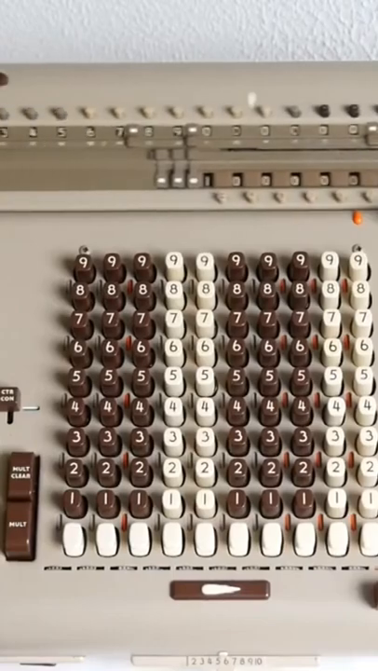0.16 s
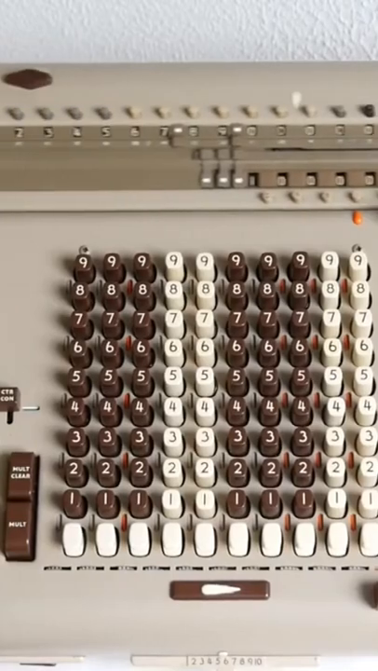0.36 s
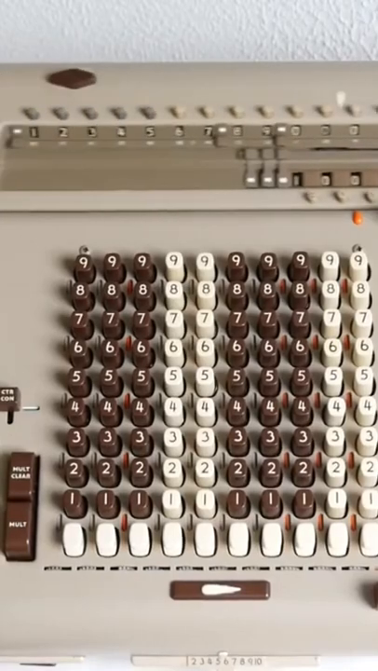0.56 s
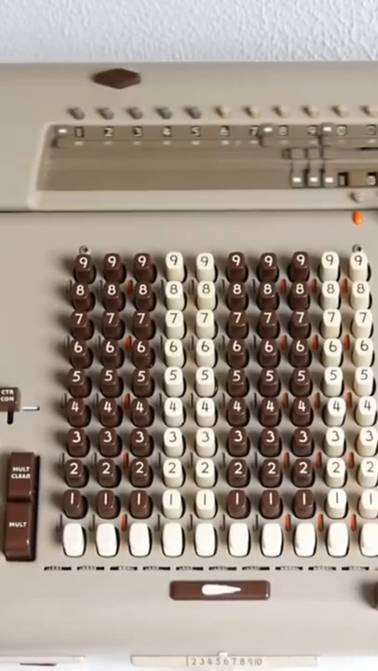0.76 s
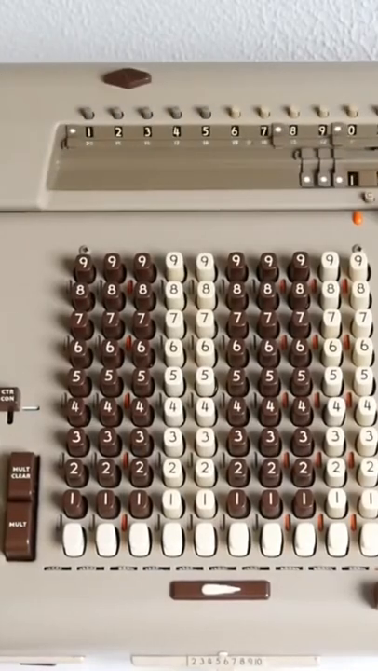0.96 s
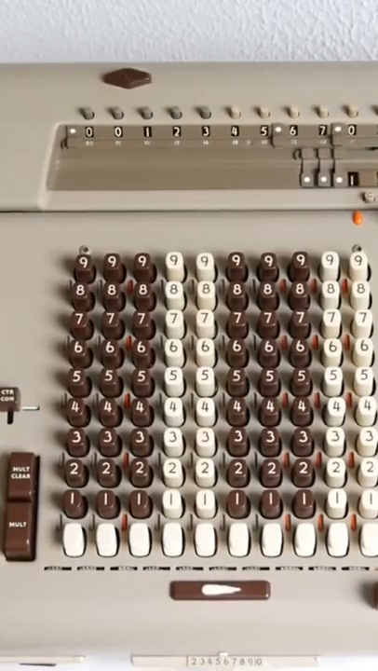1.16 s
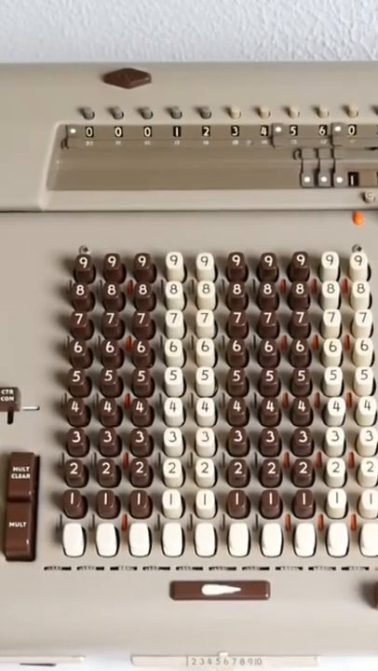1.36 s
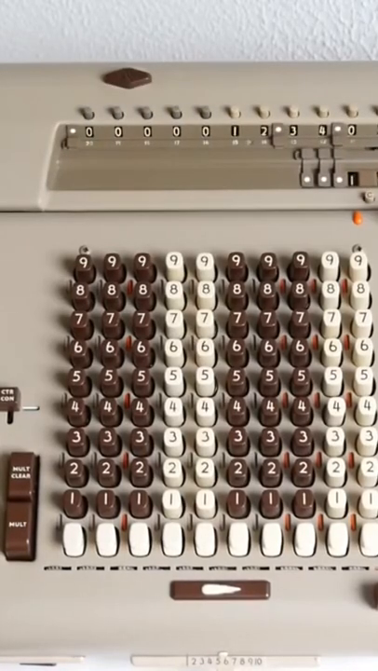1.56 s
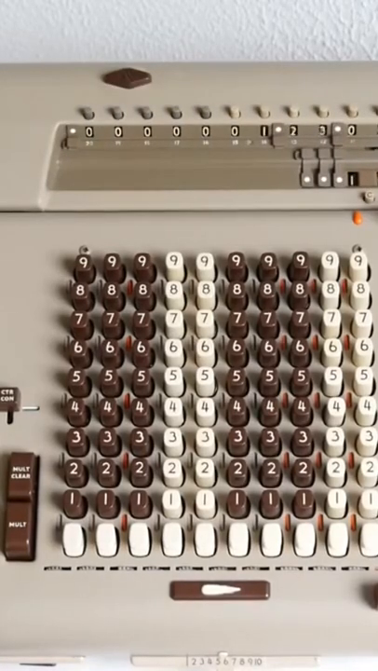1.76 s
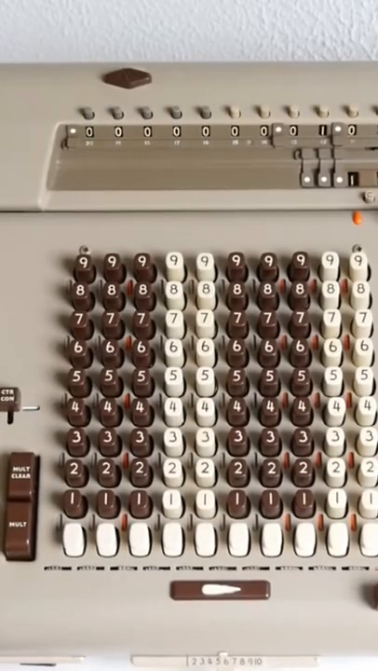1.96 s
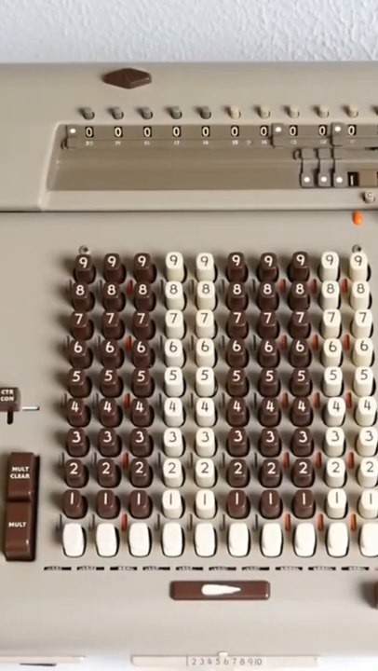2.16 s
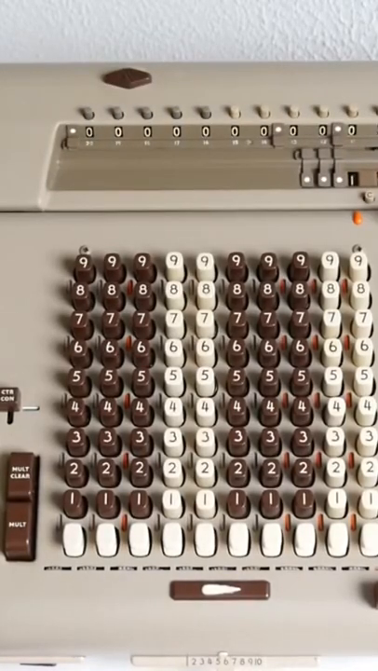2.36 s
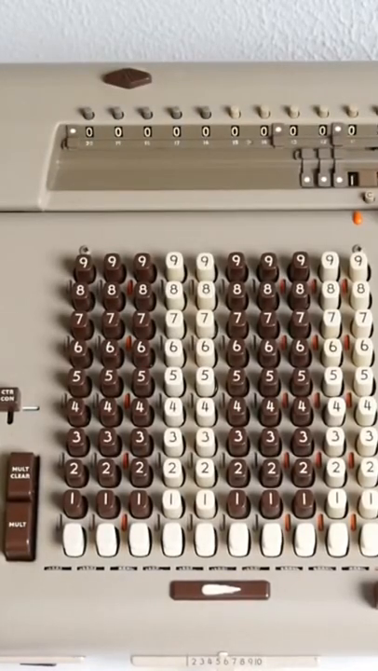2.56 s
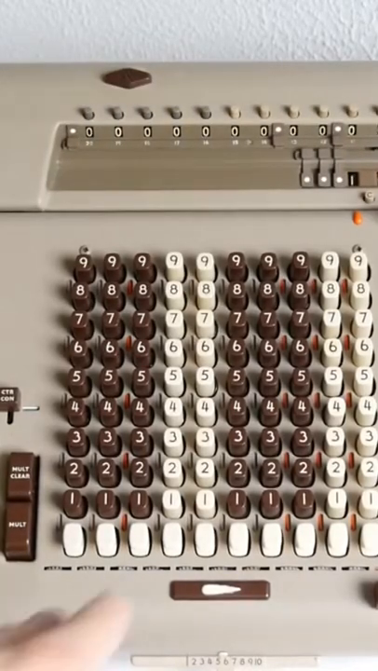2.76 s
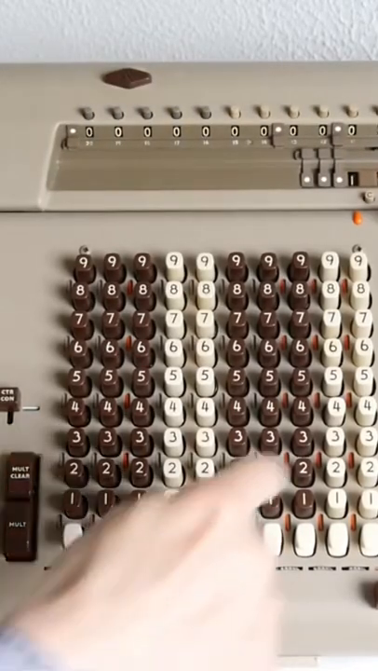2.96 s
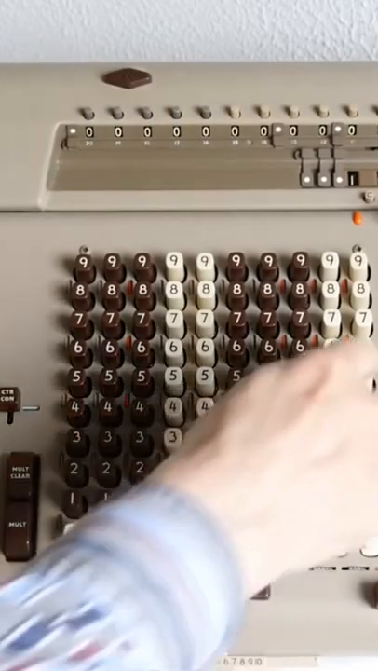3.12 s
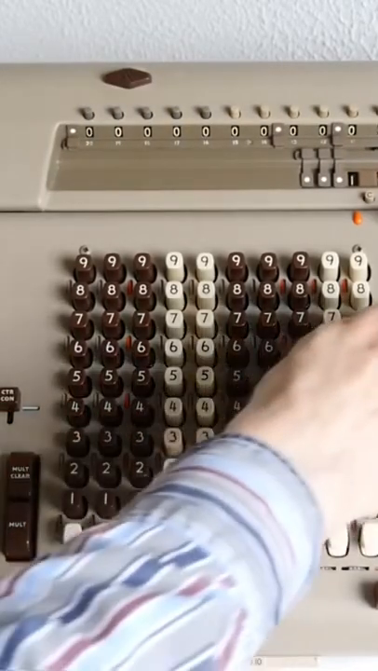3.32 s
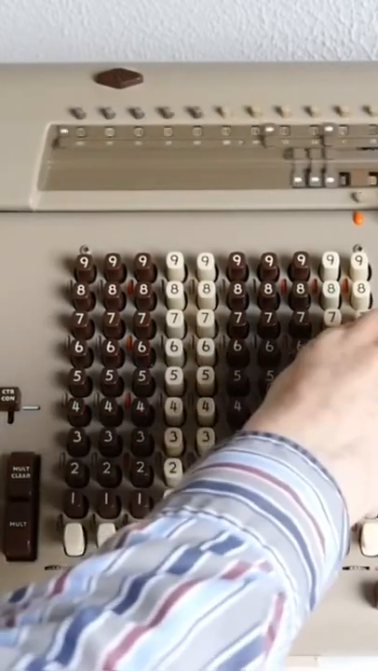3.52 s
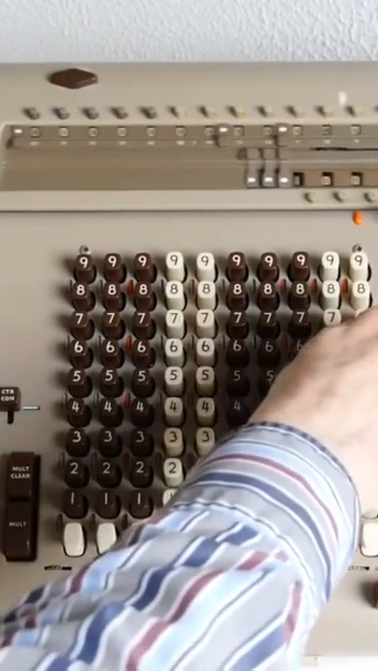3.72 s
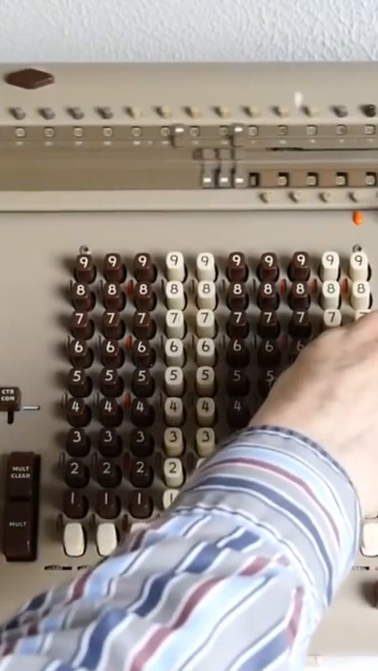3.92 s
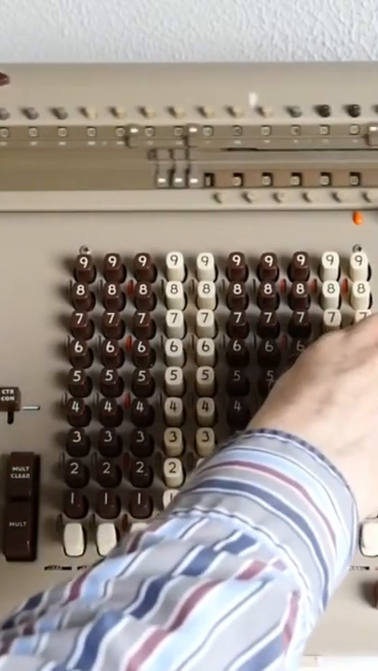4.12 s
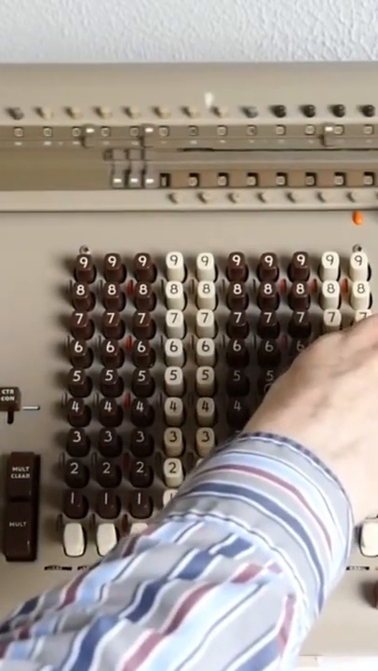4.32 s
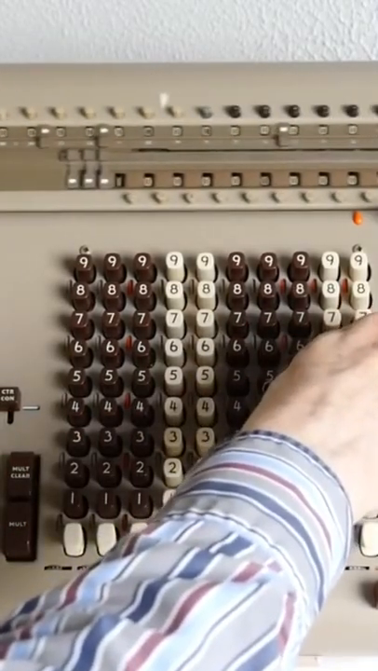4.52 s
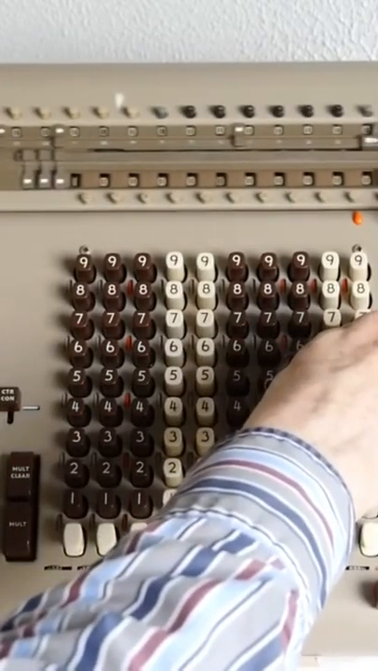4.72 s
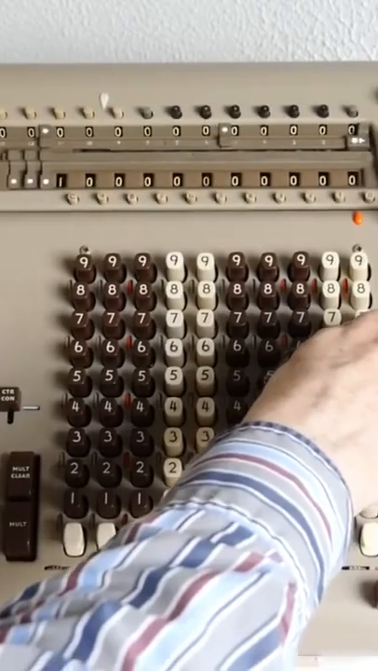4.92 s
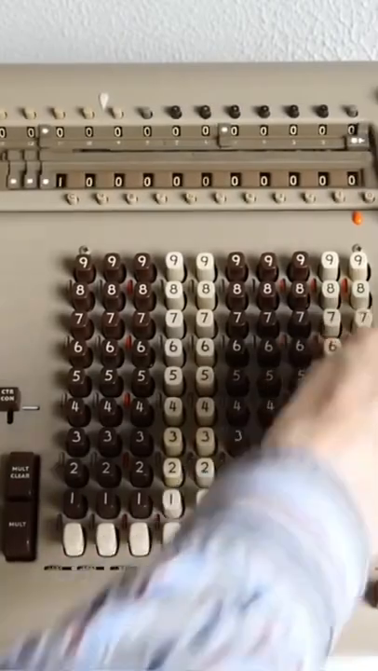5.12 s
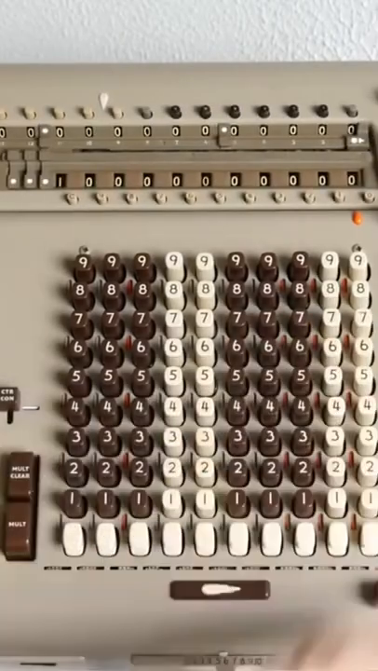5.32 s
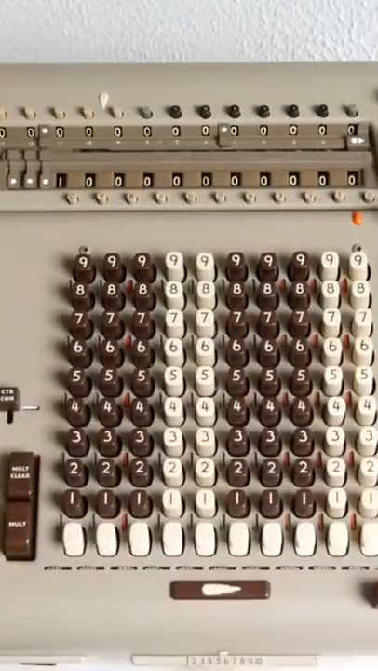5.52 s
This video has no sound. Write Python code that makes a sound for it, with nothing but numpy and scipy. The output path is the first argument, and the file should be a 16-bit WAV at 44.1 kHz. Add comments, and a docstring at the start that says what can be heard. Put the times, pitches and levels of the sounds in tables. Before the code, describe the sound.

Close up in a quiet room, an old electric calculating machine rattles about seven to eight times a second, first stepping its carriage, then cycling number wheels. The motor coasts down and cuts off. A sleeve rustles softly, a key clicks, the clutch clanks, and the carriage clatters back to a hard metallic stop, with the motor whirring briefly afterwards.

```python
"""A fast, regular clatter comes first: a motor-driven mechanical calculator, close up in a quiet room.
Its main shaft turns 7.6 times a second, and every turn trips a row of cams: first stepping the carriage,
then cycling the number wheels. The motor coasts and stops; an arm rustles, a key clicks, the carriage runs
back and slams home, and the motor coasts again. Impacts are short noise sprays ringing case and steel;
the motor is coloured noise plus wavering tones, and the room is faint noise and a short echo."""
import sys
import numpy as np
from scipy import signal
from scipy.fft import rfft, irfft, next_fast_len
from scipy.io import wavfile
from scipy.ndimage import map_coordinates

SR = 44100
rng = np.random.default_rng(int(sys.argv[2]) if len(sys.argv) > 2 else 0)


def master(y):
    """Save y as 16-bit WAV."""
    cut = np.clip(np.atleast_2d(y).T, -1, 1)
    pcm = np.round(cut * 32767)  # scale
    wavfile.write(sys.argv[1], SR, pcm.astype(np.int16))


N = 246078
TURN_S = .1308  # one turn of the main shaft


def works():
    """The running mechanism: the case thuds, heavy levers clack and light pawls tick at each contact."""
    rows = contacts(jitter_s=.0001, scatter_db=1, chatter_s=0.0032, tooth_spread_db=1.5)
    times, thud_db, clack_db, tick_db, chatter = rows.T
    split_hz = 4650  # clacks lie below this, ticks above

    def heavy(hz):
        return 1 / (1 + (hz / split_hz) ** 8)

    def light(hz):
        return 1 - heavy(hz)

    clacks = steel(times, clack_db, chatter, heavy, spiky_db=13, ring_db=1.0, t60=0.22, colour_db=2.2)
    ticks = steel(times, tick_db, chatter, light, spiky_db=15.5, ring_db=3.0, t60=0.15, colour_db=0.8)
    thuds = case(times, thud_db, chatter, firm_db=-4.5, loose_db=-9.0)
    return thuds + amp(-2.0) * clacks + amp(-2.5) * ticks


# Contacts within one turn, one table for each job; levels add to those of the job.
# Columns: into_turn_s, thud_db, clack_db, tick_db
SHIFT_CAMS = [(0.007, -14.5, -12.5, -11.5), (0.0116, -16, -13.5, -6.5), (0.0135, -14, -8, -4.5),
              (0.0224, -12, -30, -18), (0.0314, -11.5, -9.5, -9.5), (0.037, -21, -8, -7.5),
              (0.0413, -24, -10, -3), (0.046, -12, -26, -6.5), (0.0475, -7.5, -10.5, -7),
              (0.0604, -13, -30, -28.0), (0.0636, -18, -12, -23), (0.0721, -9.5, -13.5, -15),
              (0.078, -19, -18.5, -18), (0.0886, -16, -14.5, -27), (0.0974, -15, -17.5, -21),
              (0.1029, -15, -18, -28.0), (0.111, -13.5, -22, -22), (0.1226, -19, -16, -16)]
ADD_CAMS = [(.001, -20, -6, -4.5), (.0075, -21.5, -13, -15), (0.0098, -16, -11, -10),
            (0.0129, -12.5, -13, -6.5), (0.0355, -22, -9, -11), (0.0426, -18, -11.5, -24),
            (.049, -12, -13, -22), (0.0632, -16, -16.5, -14.5), (0.0686, -15, -11, -13.5),
            (0.0836, -16.5, -19, -22), (0.0881, -15, -11.5, -15.5), (0.0951, -17.5, -9, -13),
            (.0985, -8.5, -9, -10.5), (.102, -8, -17, -15), (0.1119, -11.5, -11, -9),
            (0.1175, -10, -11, -23), (0.1235, -15, -11, -13), (0.1282, -16, -13, -18)]
RETURN_CAMS = [(0.0012, -12, -13, -14), (0.0065, -14.5, -9.5, -6), (0.0098, -4, -12.5, -21),
               (0.0216, -10.5, -16, -10.5), (0.0302, -9, -11, -17.5), (0.0388, -8, -17.5, -19),
               (0.0439, -12, -15.5, -19), (0.049, -13, -14, -11), (0.0566, -11, -11, -13),
               (0.0654, -11, -12, -22), (0.0703, -8, -14, -11), (0.0776, -7, -11.5, -12),
               (0.0872, -23, -12.5, -13), (0.095, -10.5, -8.5, -8.5), (0.1031, -8, -8, -7),
               (0.1176, -12, -18, -15.5), (0.1217, -14, -17, -11), (0.1274, -16, -8, -18)]
# The three jobs: stepping the carriage, cycling the wheels, running the carriage back.
# Columns: start_s, stop_s, thud_db, clack_db, tick_db, drop_at_start_db, drop_at_end_db (negative = louder)
JOBS = [(0.0, 0.786, -25, -26, -30.5, 0, -1.5), (0.785, 2.056, -23.5, -26.5, -25, 0, 7),
        (3.3757, 5.075, -24.5, -24, -27, 2, 1.5)]
# One gear tooth meeting the next, before the job's level is added.
TOOTH_DB = (-24.5, -30, -35)  # thud, clack, tick
TOOTH_CHATTER_S = .004
# The drive goes slack after the carriage's last catch, so its clacks and ticks soften.
SLACK_FROM_S, SLACK_UNTIL_S, SLACK_DB = 4.806, 4.9, -3


def contacts(jitter_s, scatter_db, chatter_s, tooth_spread_db, count=48):
    """All contacts, repeated by cams and teeth or single: (s, thud dB, clack dB, tick dB, chatter s)."""
    rows = []
    for job, cams in zip(JOBS, (SHIFT_CAMS, ADD_CAMS, RETURN_CAMS)):
        start, stop, *job_db, _, _ = job
        # uneven teeth rattle between the cams, in the same pattern on every turn of the job
        when = (np.arange(count) + rng.random(count)) * TURN_S / count
        size_db = tooth_spread_db * rng.standard_normal((count, 3)) + TOOTH_DB
        teeth = [(s, *db, TOOTH_CHATTER_S) for s, db in zip(when, size_db)]
        turn = np.array([(*cam, chatter_s) for cam in cams] + teeth)
        run = np.vstack([turn + (s, *job_db, 0) for s in np.arange(start, stop, TURN_S)])
        s = run[:, :1]
        run[:, 1:4] += effort_db(job, s)
        run[:, 2:4] += SLACK_DB * ((s > SLACK_FROM_S) & (s < SLACK_UNTIL_S))
        rows += list(run[run[:, 0] < stop])
    spread = [jitter_s, scatter_db, scatter_db, scatter_db, 0]
    chance = rng.standard_normal((len(rows), 5)) * spread
    return np.vstack([blows(), carries(), idling(scatter_db=0.5), rows + chance])


def effort_db(job, s):
    """A job's impacts keep their middle level for most of its course and change toward the two ends."""
    start, stop, *_, first_db, last_db = job
    power = 3.6  # the higher, the longer the middle level lasts
    along_job = np.clip(2 * (s - start) / (stop - start) - 1, -1, 1)
    return -np.where(along_job < 0, first_db, last_db) * np.abs(along_job) ** power


# The carry ripples along the number wheels, one wheel farther on every turn.
CARRY_END_S, CARRY_STEP_S = .137, .0066  # end of ripple after the turn starts; time between wheels
CARRY_DB, CARRY_LOSS_DB = (-48, -35.5, -38.5), 4  # first wheel's thud, clack, tick; loss per wheel
CARRY_CHATTER_S = 0.0029


def carries(count=7):
    """On each turn the carry trips one more pawl than on the last, so its ripple starts earlier."""
    start = JOBS[1][0]
    rows = []
    for turn in range(1, count + 1):
        end = start + turn * TURN_S + CARRY_END_S
        for wheel in range(turn):
            level_db = np.subtract(CARRY_DB, CARRY_LOSS_DB * wheel)
            rows.append((end - (turn - wheel) * CARRY_STEP_S, *level_db, CARRY_CHATTER_S))
    return rows


# The carriage or the shaft slams into a stop.
# Columns: start_s, thud_db, clack_db, tick_db, rocking_of_the_case_db
STOPS = [(.6906, -36, -32, -35, -39), (1.9878, -45, -34, -26.5, -30), (5.067, -62, -28.5, -25, -36.5)]
SLAM_CHATTER_S = 0.0008
# Each stop rebounds once; its levels add to the slam's thud, clack and tick.
REBOUND_S, REBOUND_DB, REBOUND_CHATTER_S = .0027, (-18, 0.5, -8.5), 0.002
# Latches drag over their catches. Columns: start_s, clack_db, tick_db
LATCHES = [(0.665, -40, -45), (.678, -35, -47), (0.712, -36, -42), (.788, -33, -26.5), (0.799, -45, -42),
           (.913, -29, -28), (.922, -41, -31), (1.827, -35, -27.5), (1.847, -27, -26.5),
           (1.969, -27.5, -26), (1.975, -29, -25.5)]
LATCH_THUD_DB, LATCH_CHATTER_S = -48, 0.0069
# The moving carriage and wheels knock. Columns: start_s, thud_db, clack_db, tick_db, chatter_s
KNOCKS = [(1.191, -39, -34, -31, .003), (1.9642, -35, -27, -31, .0012), (2.096, -40, -46, -56, 0.0022),
          (3.514, -52, -33, -52, 0.0012), (3.896, -43, -32, -34, .002), (4.036, -47, -36, -39, 0.0019),
          (4.171, -44, -32, -43, 0.0019), (4.428, -30.5, -36, -39, 0.0041),
          (4.695, -44, -29.5, -49, 0.0051), (4.722, -27, -43, -33, 0.0088),
          (4.8022, -35, -31, -29.5, 0.0017), (5.0765, -48, -32.5, -30.5, 0.0013)]
# Keys and their links click. Columns: start_s, level_db
KEYS = [(3.2947, -47), (3.2984, -45), (3.3023, -37), (3.3422, -35), (3.351, -35.5), (5.243, -47),
        (5.369, -50), (5.428, -57)]
KEY_DB, KEY_CHATTER_S = (-23, -4, -1), .002  # thud, clack, tick added to each key's level
# The clutch grabs as the carriage starts back. Columns: start_s, level_db, pitch_hz (rings most near it)
CLUTCH = [(3.358, -20, 1910), (3.371, -12.5, 1790), (3.387, -10.5, 2187)]
GRAB_DB, GRAB_CHATTER_S = (-20.5, -21, -38), 0.0067  # jolt's thud, clack, tick added to each grab's level


def blows():
    """Single contacts of latches, knocks, keys and clutch, and stops that rebound and rock the case."""
    rows = [(s, LATCH_THUD_DB, clack, tick, LATCH_CHATTER_S) for s, clack, tick in LATCHES]
    rows += list(KNOCKS)
    rows += [(s, *np.add(db, KEY_DB), KEY_CHATTER_S) for s, db in KEYS]
    rows += [(s, *np.add(db, GRAB_DB), GRAB_CHATTER_S) for s, db, _ in CLUTCH]
    for s, *slam_db, rock_db in STOPS:
        rows.append((s, *slam_db, SLAM_CHATTER_S))
        rows.append((s + REBOUND_S, *np.add(slam_db, REBOUND_DB), REBOUND_CHATTER_S))
        rows += rocking(s, rock_db, count=3)
    return rows


def rocking(s, db, count):
    """After a stop the case rocks on its feet a few times, each time more softly."""
    period_s, loss_db, chatter_s = .021, 5, 0.0076
    rattle_db = -4.5  # clack and tick against the thud
    rows = []
    for k in range(count):
        thud = db - loss_db * k
        rows.append((s + period_s * (k + 1), thud, thud + rattle_db, thud + rattle_db, chatter_s))
    return rows


# Loose gears rattle as the motor coasts: starting thud, clack and tick.
IDLE_DB, IDLE_CHATTER_S = (-83, -58.5, -55.5), 0.0013


def idling(scatter_db, count=22):
    """Unloaded gears tap to and fro in their play, ever more softly."""
    rows = []
    for _, released, off, *_ in MOTOR_RUNS:
        coasted = (np.arange(count) + rng.random(count)) / count * (off - released)
        size_db = scatter_db * rng.standard_normal(count) - WHIRR_SAG_DB_PER_S * coasted
        rows += [(released + s, *np.add(db, IDLE_DB), IDLE_CHATTER_S) for s, db in zip(coasted, size_db)]
    return rows


def contact_gain(levels):
    """Level to impulse size: one contact a turn at 0 dB would have an rms of 1."""
    return amp(levels) * np.sqrt(TURN_S * SR)


def bounces(times, levels, chatter, spiky_db):
    """Each contact closes and then chatters in a dying spray of tiny impacts."""
    t = np.arange(SR // 30) / SR
    shape = (len(times), len(t))
    age = t / chatter[:, None]
    uneven = amp(spiky_db * rng.standard_normal(shape) / 2)
    spray = rng.standard_normal(shape) * uneven * np.exp(-age) * (1 - np.exp(-age / 0.36))
    spray *= (contact_gain(levels) / np.linalg.norm(spray, axis=1))[:, None]
    at = np.round(np.abs(times) * SR).astype(int)[:, None] + np.arange(len(t))
    return np.bincount(at.ravel(), spray.ravel(), N)[:N]


# Resonances of the case and frame. Columns: pitch_hz, width_hz, level_db
CASE = [(96, 12, -20), (124.5, 9.7, -6), (165, 8.9, -6.5), (195, 7.9, 3.5), (253.7, 12.4, -3),
        (280.7, 12.6, 5), (309.5, 13.5, 5.5), (343.6, 20.6, 1), (426, 8.8, 1.5), (450, 42, -11),
        (534.1, 7.8, -2), (631, 13, -3.5), (737, 25, -5.5), (854, 14, -4.5)]


def case(times, levels, chatter, firm_db, loose_db):
    """Contacts push the resonant case: a firm push of fixed shape plus a random, loose shudder."""
    at = np.round(np.abs(times) * SR).astype(int)
    pushes = np.bincount(at, contact_gain(levels), N)[:N]
    shudder = bounces(times, levels, 2 * chatter, spiky_db=10.5)

    def body_gain(f):
        power = sum(np.abs(amp(db) * f * w / (c * c - f * f + 1j * f * w)) ** 2 for c, w, db in CASE)
        power = power / (1 + (f / 900) ** 6)  # less treble
        return np.sqrt(power / (1 + (70 / (f + 1)) ** 2))  # less deep bass

    return through(amp(firm_db) * pushes + amp(loose_db) * shudder, causal(body_gain))


# Ring of the steel levers and wheels. Columns: pitch_hz, level_db (per Hz)
STEEL = [(250, -22.5), (500, 3.5), (750, 0), (1000, -2), (1600, 0.5), (2300, -1.5), (3500, -1.5),
         (5200, -2), (7500, -1), (9000, 1), (10100, 3), (10900, -1), (11600, -13.5), (12200, -73)]
PART_BAND_HZ = 259  # breadth of each steel part's own colour


def steel(times, levels, chatter, share, spiky_db, ring_db, t60, colour_db, count=9):
    """Impacts strike steel parts of different colour, heard directly and through a dense ring."""
    # the place in the turn picks the part, so a job's turns strike much the same parts
    part = (times % TURN_S / TURN_S * 2 * count).astype(int) % count
    colours = rng.standard_normal((count, 200))
    colours -= colours.mean(axis=0)
    sound = np.zeros(N)
    for k in range(count):
        struck = part == k
        force = bounces(times[struck], levels[struck], chatter[struck], spiky_db)
        response = amp(ring_db) * tail(t60)
        response[0] += 1  # the direct sound
        colour = causal(lambda hz: amp(colour_db * map_coordinates(colours[k], [hz / PART_BAND_HZ])))
        sound += through(force, signal.fftconvolve(response, colour))
    shared = causal(lambda hz: amp(along(STEEL, hz)) * np.sqrt(share(hz)))
    return through(sound, shared) / np.hypot(1, amp(ring_db))


# The carriage drops into its last place. Columns: pitch_hz, level_db, t60_s (time to fall 60 dB)
CLUNK_RING = [(318.5, -18, .12), (522, -2.5, 0.023), (835, -3.5, 0.016), (1246, -1, 0.022),
              (1590, 2, 0.012), (2860, -8, .016)]


def clunk():
    """The carriage seats with one short, dull knock made of a few dying tones."""
    return ring(.6905, CLUNK_RING, -6.5, rise_s=0.00056)


# Tones of the clutch teeth. Columns: pitch_hz, level_db, t60_s
CLUTCH_RING = [(609, -13, 0.044), (860, -35, 0.024), (1220, -9, 0.018), (1790, -16, 0.051),
               (1910, -10, 0.032), (2270, -15, 0.081)]
CLUTCH_FOCUS_DB, CLUTCH_FOCUS_HZ = 11, 130  # boost of modes near a grab's own pitch; how near


def clutch():
    """The clutch teeth slip and clank before they hold, each grab favouring its own pitch."""
    sound = np.zeros(N)
    for s, db, pitch in CLUTCH:
        modes = []
        for hz, mode_db, t60 in CLUTCH_RING:
            focus_db = CLUTCH_FOCUS_DB * np.exp(-((hz - pitch) / CLUTCH_FOCUS_HZ) ** 2)
            modes.append((hz, mode_db + focus_db, t60))
        sound += ring(s, modes, db, rise_s=0.001)
    return sound


def ring(s, modes, db, rise_s):
    """A steel part struck at time s rings its (Hz, dB, t60 s) modes, each at a slightly random level."""
    t = np.maximum(np.arange(N) / SR - s, 0)[:round((s + .25) * SR)]
    sound = np.zeros(len(t))
    for hz, mode_db, t60 in modes:
        level = amp(db + mode_db + rng.normal(0, 2.1) - 60 * t / t60)
        sound += level * np.sin(2 * np.pi * hz * t)
    return np.pad(sound * (1 - np.exp(-t / rise_s)), (0, N - len(t)))


# A stop sets the heavy frame booming. Columns: pitch_hz, level_db (over the rocking, before the rise), t60_s
FRAME_RING = [(134.14, -12, .3), (171.5, 1.5, 0.28), (206, 4.5, 0.45), (390, 7, 0.39)]
FRAME_RISE_S = 0.017


def frame():
    """The frame takes up each slam gradually and booms on for a moment in a few low tones."""
    t = np.arange(SR // 2) / SR
    sound = np.zeros(N + SR)
    for s, *_, rock_db in STOPS:
        for hz, db, t60 in FRAME_RING:
            fall = amp(rock_db + db + rng.normal(0, 1.6) - 60 * t / t60)
            swell = fall * (1 - np.exp(-t / FRAME_RISE_S))
            sound[round(s * SR):][:len(t)] += swell * np.sin(2 * np.pi * (hz * t + rng.random()))
    return sound[:N]


# The motor's runs.
# Columns: on_s, load_released_s, off_s, whine_db, whine_tilt_db_per_octave, whine_unsteadiness_rad
MOTOR_RUNS = [(0.0, 2, 2.462, -44.5, -2.5, .35), (3.341, 5.086, 5.6, -52, 3, 1.8)]
# Motor and gear tones. Columns: pitch_hz (at speed 1), level_db, fade_while_coasting_db_per_s
WHINE = [(199, -14, 24), (269, -19, 30), (378, -16, 28), (733, -4.5, 10), (1087, -4.5, 30), (2218, -10, 21),
         (2455, -11, 18), (3607, -13, 21), (3795, -10, 21)]
# Colour of the brush noise. Columns: pitch_hz, level_db (per Hz, relative)
BRUSHES = [(50, -36), (110, -13), (190, -1), (400, -9), (520, -6.5), (1000, -12), (2200, -7), (3200, -9),
           (3800, -9.5), (4300, -10), (6500, -13), (10000, -10), (11300, -22), (12000, -59)]
WHIRR_DB, WHIRR_LOADED_DB = -38.5, 7  # brushes running free; extra until the load is released
WHIRR_SAG_DB_PER_S = 17  # fade of the whirr as the motor coasts
WHINE_FLUTTER_DB = 1.5  # the brushes roughen the whine
SWITCH_S = 0.0013  # the motor starts and is braked this quickly


def motor():
    """Brushes whirr and the motor whines; once the load is gone each tone fades at its own pace."""
    t = np.arange(N) / SR
    whirr = unit(noise(BRUSHES) * amp(0.74 * wobble(350)))
    sound = np.zeros(N)
    for on, released, off, whine_db, tilt_db, unsteady in MOTOR_RUNS:
        running = np.clip(np.minimum(t - on, off - t) / SWITCH_S + .5, 0, 1)
        coasted = np.maximum(t - released, 0)
        whine = np.zeros(N)
        for hz, db, fade in WHINE:
            level = amp(db + tilt_db * np.log2(hz / 1000) - fade * coasted)
            whine += level * tone(hz, waver_db=2.0 * unsteady, drift=unsteady)
        whirr_db = WHIRR_DB + WHIRR_LOADED_DB * (t < released) - WHIRR_SAG_DB_PER_S * coasted
        fluttered = amp(whine_db + WHINE_FLUTTER_DB * wobble(110)) * whine
        sound += running * (amp(whirr_db) * whirr + fluttered)
    return sound


# The motor's speed. Columns: start_s, relative_speed
SPEED = [(0, 1), (3.3, 1), (5.05, 1.01), (5.2, 1.03), (5.58, 1.03)]


def tone(hz, waver_db, drift):
    """A slightly unsteady line of rms about 1 whose pitch follows the motor's speed."""
    seconds = np.cumsum(curve(SPEED)) / SR
    phase = 2 * np.pi * hz * seconds + drift * wobble(26)
    return amp(waver_db * wobble(18)) * np.sqrt(2) * np.sin(phase)


# The arm reaches for the key. Columns: start_s, level_db (before the lift)
SLEEVE = [(2.48, -61), (2.54, -53), (2.59, -58), (2.89, -54), (2.898, -51.5), (3.066, -59.5), (3.27, -93)]
SLEEVE_LIFT_DB = 3.5
# Colour of the rustle. Columns: pitch_hz, level_db (per Hz, relative)
RUSTLE = [(88, -48), (150, 1), (368, 1.5), (404, -14), (687, -5), (1330, -4), (9110, -6), (12000, -19),
          (15600, -47), (22000, -120)]


def sleeve():
    """Cloth rubs softly: coloured noise that follows the level of the reaching arm."""
    return amp(curve(SLEEVE) + SLEEVE_LIFT_DB) * noise(RUSTLE)


# Reflections from the sides. Columns: pitch_hz, level_db
WIDTH = [(30, -8), (80, -9), (170, -19), (350, -16.5), (700, -15.5), (1400, -20), (2800, -26), (5600, -33),
         (9000, -24), (11500, -26)]


def walls(machine):
    """Side walls answer the machine with a short, dense, coloured echo."""
    return filtered(through(machine, tail(0.095)), lambda hz: amp(along(WIDTH, hz)))


# Colour of the quiet room. Columns: pitch_hz, level_db (per Hz, relative)
AIR = [(15, -67), (25, -32), (121, -12.5), (141, -8.5), (331, -12.5), (475, -8), (569, -13), (1110, -12),
       (2360, -19), (9270, -23), (11100, -22), (12000, -64), (15600, -90), (22000, -120)]
# The room's hush comes from all round: its sideways part. Columns: pitch_hz, level_db
AIR_WIDTH = [(60, 5), (140, 1.5), (350, 5), (830, -1.5), (2010, -2.5), (4830, -20), (11600, -14)]


def hush():
    """The quiet room's air: separate faint noises for the middle and the sides."""
    middle = amp(-53.0) * noise(AIR)
    side = amp(-52.5) * filtered(noise(AIR), lambda hz: amp(along(AIR_WIDTH, hz)))
    return middle, side


def amp(db):
    """Decibels to gain."""
    return 10 ** (np.asarray(db) / 20)


def unit(x):
    """Scale to rms 1."""
    return x / np.sqrt(np.mean(x ** 2) + 1e-20)


def along(points, hz):
    """Read (Hz, value) points on a log frequency axis."""
    f, v = np.transpose(points)
    return np.interp(np.log(hz + 1), np.log(f + 1), v)


def curve(rows):
    """Turn (s, value) rows into one value per sample."""
    s, value = np.transpose(rows)
    return np.interp(np.arange(N) / SR, s, value)


def wobble(rate):
    """A smooth random curve with rate knots a second."""
    knots = rng.standard_normal(int(N * rate / SR) + 4)
    return map_coordinates(knots, [np.arange(N) * rate / SR])


def filtered(x, response):
    """Multiply the spectrum of x by a response over frequency."""
    size = x.shape[-1]
    m = next_fast_len(size + SR // 2)
    return irfft(rfft(x, m) * response(np.fft.rfftfreq(m, 1 / SR)), m)[..., :size]


def causal(gain):
    """The quickest (minimum-phase) impulse response of energy 1 with this gain shape over frequency."""
    m = 2 ** 12
    cepstrum = irfft(np.log(np.maximum(gain(np.fft.rfftfreq(m, 1 / SR)), 1e-6)))
    # fold the cepstrum so that nothing sounds before the strike
    cepstrum[1:m // 2] *= 2
    cepstrum[m // 2 + 1:] = 0
    h = irfft(np.exp(rfft(cepstrum)))
    return h / np.linalg.norm(h)


def noise(spectrum):
    """Coloured noise of rms 1."""
    return unit(filtered(rng.standard_normal(N), lambda hz: amp(along(spectrum, hz))))


def through(x, h):
    """Let x ring the impulse response h."""
    return signal.fftconvolve(x, h)[:N]


def tail(t60):
    """A dense random ring of energy 1 that falls 60 dB in t60 seconds."""
    t = np.arange(SR // 2) / SR
    h = rng.standard_normal(len(t)) * amp(-60 * t / t60)
    return h / np.linalg.norm(h)


def scene():
    """The machine in front, the room's answer from the sides, over a quiet floor."""
    machine = works() + clunk() + clutch() + frame() + motor()
    echo = amp(-15.5) * through(machine, tail(0.2))
    hush_mid, hush_side = hush()
    mid = machine + echo + sleeve() + hush_mid
    side = walls(machine) + hush_side
    return np.array([mid + side, mid - side])  # left, right


def record(dry):
    """The microphone rounds off the highest peaks, has one narrow dip in the treble and a low band limit."""
    rounded = dry / (1 + np.abs(dry / .92) ** 6) ** (1 / 6)
    top_hz, dip_hz, dip_half_width_hz = 12100, 7870, 55

    def response(hz):
        dip = 1 - 1.0 / (1 + ((hz - dip_hz) / dip_half_width_hz) ** 2)
        return dip * (hz < top_hz)

    return filtered(rounded, response)


dry = scene()
out = record(dry)
master(out)
```